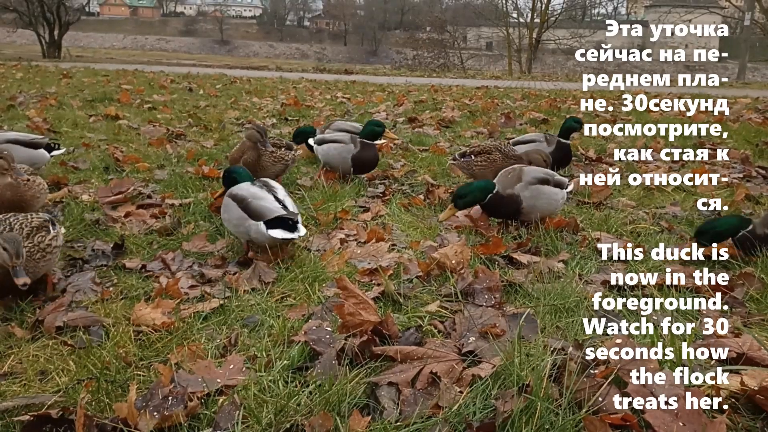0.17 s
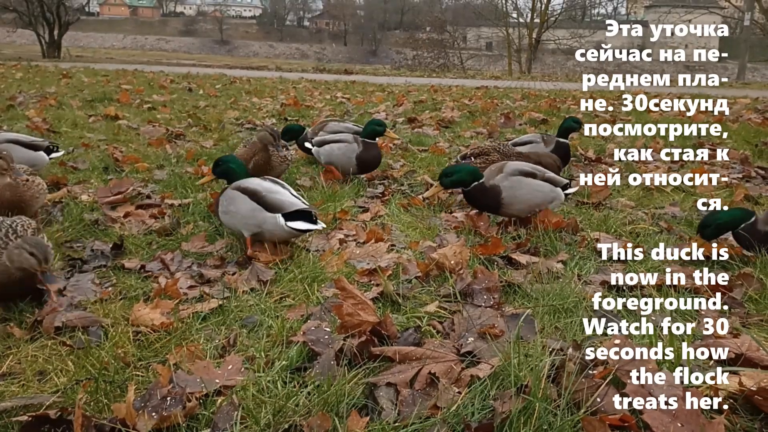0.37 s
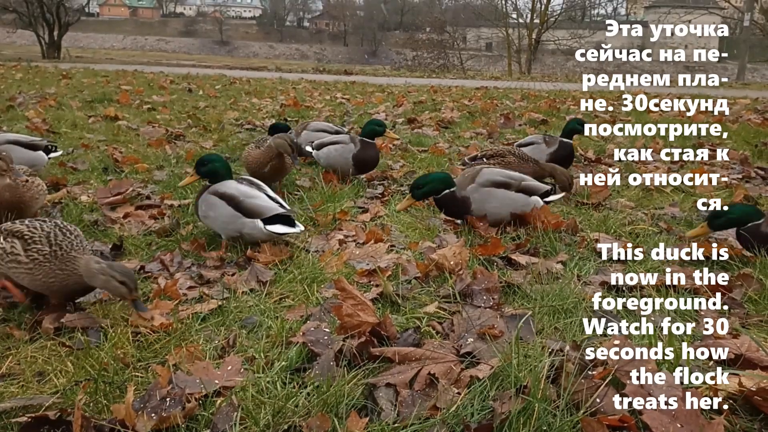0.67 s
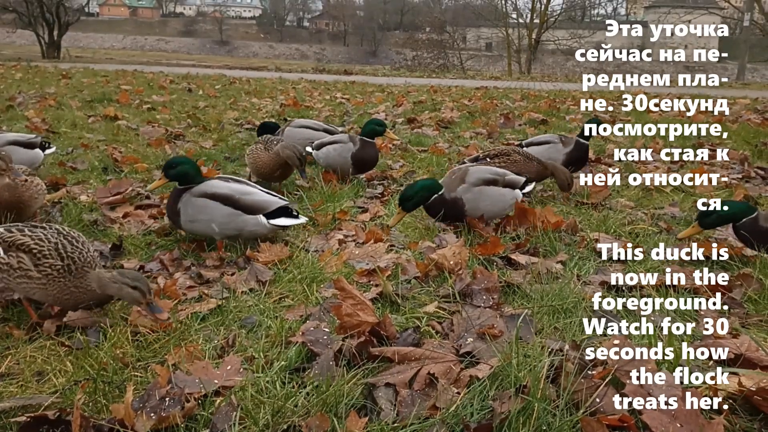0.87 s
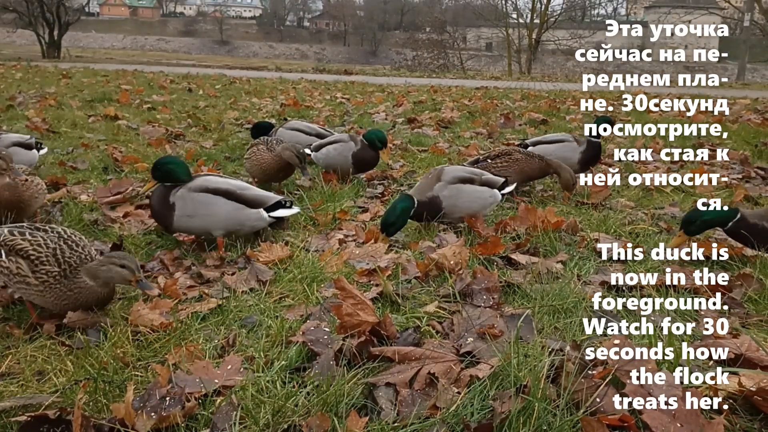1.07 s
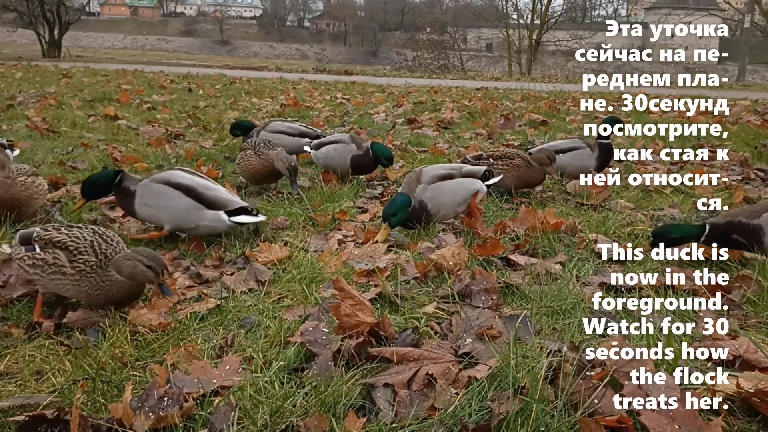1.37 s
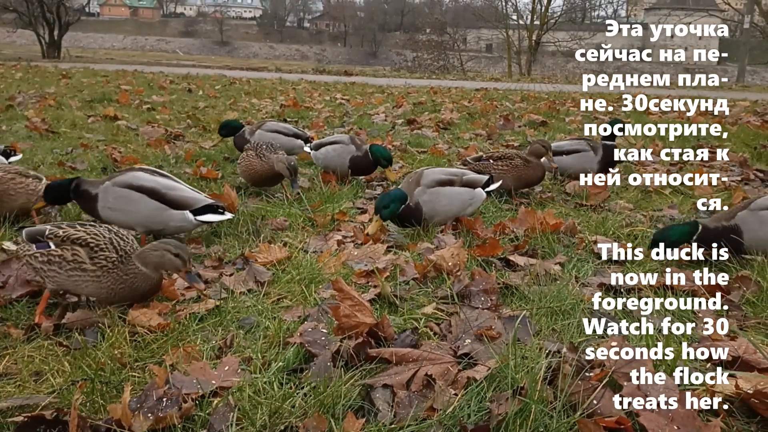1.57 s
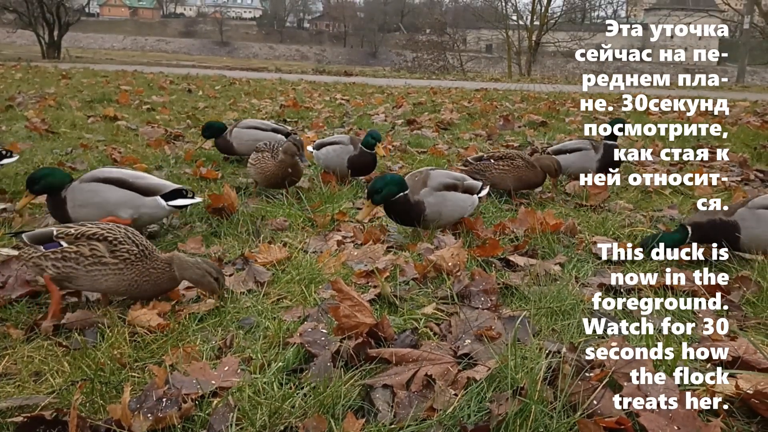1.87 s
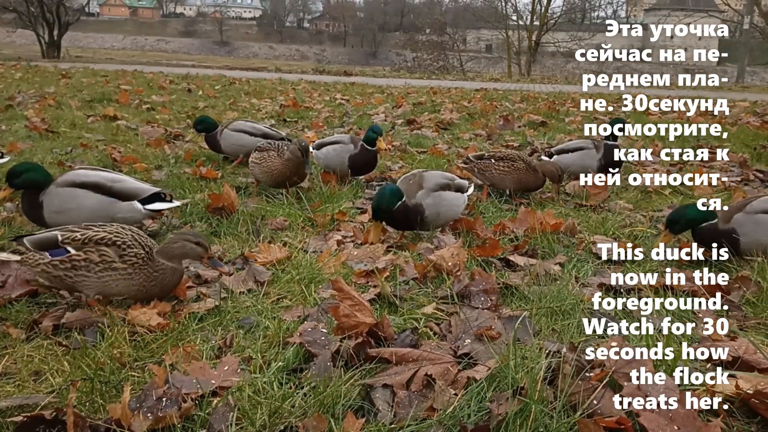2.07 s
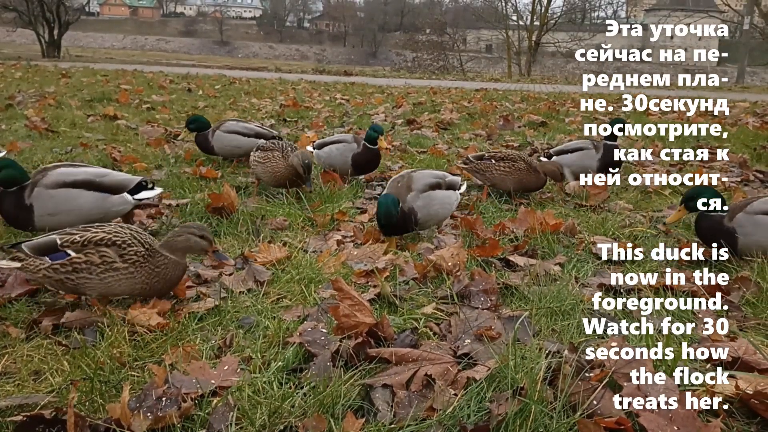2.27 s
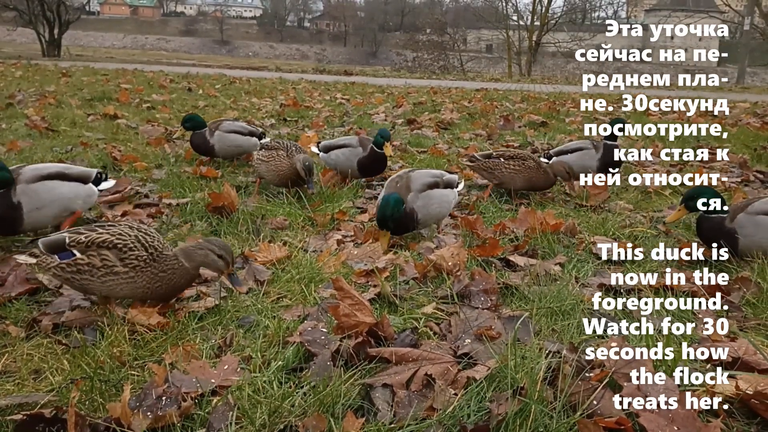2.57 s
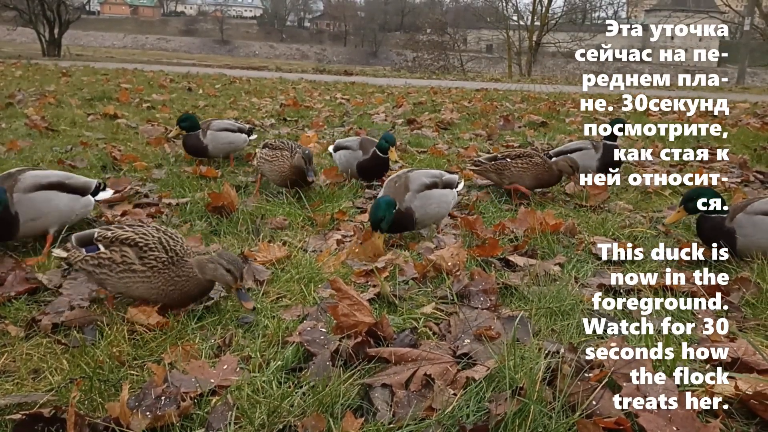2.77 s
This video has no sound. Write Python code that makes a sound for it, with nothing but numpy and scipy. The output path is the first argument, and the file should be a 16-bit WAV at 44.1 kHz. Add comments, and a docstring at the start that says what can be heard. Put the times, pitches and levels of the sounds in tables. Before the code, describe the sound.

Ducks give short, soft, raspy quacks while foraging in leaves, over low wind-like buffeting outdoors

```python
"""Ducks on a leafy lawn give short, soft, raspy quacks: breathy puffs, about a hundred a second, ring throat tones.
Their bills click, tick and pop, made from very short noise bursts; filtered noise and tiny grains stir the leaves.
Thin squeaky bird calls, made of gliding tones with a noisy haze, arch in the distance.
Low buffeting noise and filtered bumps, mostly on the left of the microphone, lie over a steady outdoor hush."""
import sys
import numpy as np
from scipy import signal
from scipy.fft import rfft, irfft
from scipy.io import wavfile

SR = 44100
rng = np.random.default_rng(int(sys.argv[2]) if len(sys.argv) > 2 else 0)


def wav_out(sig):
    """Save sig, one row per channel (or a flat mono array), as 16-bit PCM at SR to the path in sys.argv[1]."""
    wavfile.write(sys.argv[1], SR, np.round(np.clip(np.atleast_2d(sig).T, -1, 1) * 32767).astype(np.int16))


N = 129213
T = np.arange(N) / SR  # time of every sample [s]

# In all tables: balance is left minus right; a peak is the height before the balance is applied.
# Spectra give the relative strength of each pitch; the overall level is set elsewhere.

# Steady outdoor hush: (frequency [Hz], strength [dB per Hz])
HUSH_SPECTRUM = [(25, -27), (60, -6.5), (110, 1), (250, -2), (500, -11), (900, -17), (1500, -19.5),
                 (2600, -23.5), (3700, -32), (6600, -37), (8500, -46.5), (15000, -72)]
# How alike the hush is in the two ears: (frequency [Hz], left-right correlation [0 to 1])
HUSH_LIKENESS = [(100, 1), (600, 0.13), (2500, 0.15), (7000, 0.033)]
HUSH_DB = -48
# Rise and fall of the high hiss, before HISS_DB is added: (time [s], level [dB])
HISS = [(0.0, -68), (0.02, -62.5), (0.85, -62.5), (1.23, -67.5), (1.7, -59), (2.36, -68), (2.52, -59.5),
        (2.57, -68), (2.72, -59), (2.93, -65)]
# Tone of the hiss: (frequency [Hz], strength [dB per Hz])
HISS_SPECTRUM = [(3000, -27), (7000, -42), (9500, -8.5), (11400, 5), (11800, 11.5), (13500, 4),
                 (16000, -6.5)]
HISS_DB, HISS_PAN_DB = -6, 22
# Midrange rush that dies away: edges [Hz], starting level [dB], time to fall to 37 % [s]
SWELL_HZ, SWELL_DB, SWELL_FADE_S = (460, 880), -53.5, 0.21

# Rise and fall of the low buffeting, before BUFFET_DB is added: (time [s], level [dB])
BUFFET = [(0.0, -41), (0.06, -46.5), (0.37, -35), (0.4, -45.5), (0.46, -25), (0.48, -35), (0.55, -30),
          (0.74, -51.5), (0.82, -31.5), (1.02, -43.5), (1.26, -50.5), (1.32, -32), (1.39, -44), (1.44, -35),
          (1.81, -44.5), (1.84, -35), (1.93, -45), (2.1, -32), (2.14, -42), (2.3, -32.5), (2.41, -45),
          (2.49, -28.5), (2.53, -37), (2.64, -35), (2.68, -46), (2.93, -48.5)]
# Tone of the buffeting: (frequency [Hz], strength [dB per Hz])
BUFFET_SPECTRUM = [(25, -21), (42, -59), (65, -4.5), (95, 3), (160, -1), (280, -10), (450, -26.5),
                   (800, -39), (2000, -59.5)]
BUFFET_DB, BUFFET_PAN_DB, BUFFET_FLUTTER_DB = -0.5, 20, 1.5
# Low bumps on the microphone: (time [s], peak [dB], middle pitch [Hz])
BUMPS = [(0.325, -27.5, 99), (0.447, -17.5, 133), (0.498, -26, 111), (0.54, -26.5, 153),
         (0.647, -28.5, 114), (0.769, -31, 167), (0.82, -20.5, 218), (0.831, -19.5, 157),
         (0.862, -26.5, 222), (0.938, -31, 231), (1.316, -19.5, 100), (1.429, -28.5, 194),
         (1.475, -27, 107), (1.518, -27, 132), (1.569, -31, 213), (1.685, -29, 121), (1.832, -32, 104),
         (2.079, -20.5, 127), (2.269, -23, 150), (2.289, -32, 114), (2.309, -26, 161), (2.48, -20, 138),
         (2.550, -28.5, 210)]
BUMP_WIDTH, BUMP_PAN_DB = 1.695, 34  # width: edge of the band as a ratio to its middle

# Distant squeaky calls: (time [s], length [s], first pitch [Hz], middle pitch [Hz], last pitch [Hz],
# level [dB], hoarse haze against the tone [dB])
SQUEAKS = [(0.005, 0.056, 2610, 2430, 2180, -68, -11), (0.159, 0.035, 2540, 2530, 2310, -67.5, -5),
           (0.23, 0.079, 2390, 2330, 2220, -65.5, -6), (0.300, 0.031, 1730, 1903, 1680, -53, -3.5),
           (0.314, 0.035, 1470, 1450, 1350, -58, -25), (0.35, 0.0256, 2155, 1970, 1690, -55, -5),
           (0.369, 0.03, 2000, 1828, 1560, -53, -19), (0.818, 0.13, 2120, 1863, 1730, -64, -7),
           (0.896, 0.083, 2485, 2576, 2390, -64.5, -17), (1.009, 0.067, 2367, 2175, 1870, -63, -18),
           (1.112, 0.13, 2520, 2817, 2300, -64, -18), (1.344, 0.043, 2640, 2370, 2050, -54.5, -9),
           (1.400, 0.042, 2600, 2680, 2470, -59, -4.5), (1.966, 0.068, 2700, 2350, 1980, -61, -7),
           (1.969, 0.037, 2000, 1900, 1670, -55, -19), (2.279, 0.038, 2630, 2190, 2040, -57.5, -5),
           (2.293, 0.052, 2540, 2577, 2440, -62, -27.5), (2.358, 0.045, 2630, 2540, 2300, -61, -26),
           (2.521, 0.08, 2544, 2680, 2340, -65, -14), (2.746, 0.025, 2170, 2120, 1970, -49, -16),
           (2.769, 0.054, 2590, 2785, 2640, -56, -7), (2.781, 0.099, 3280, 3300, 3130, -71, -11),
           (2.805, 0.03, 2450, 2628, 2400, -43.5, -12), (2.818, 0.081, 2053, 1820, 1630, -59.5, -2)]
SQUEAK_WAVER, SQUEAK_OVERTONE_DB, HOARSE_WIDTH = .007, -34, 1.25  # waver and width are ratios of pitch

# Rise and fall of the leaf rustle, before RUSTLE_DB is added: (time [s], level [dB])
RUSTLE = [(0.0, -73), (0.22, -68.5), (0.24, -75), (0.5, -67.5), (1.18, -75), (1.64, -66.5), (1.65, -63),
          (1.79, -76), (1.84, -64), (2.05, -75.5), (2.15, -66), (2.23, -80), (2.69, -69.5), (2.93, -67)]
# Tone of the rustle: (frequency [Hz], strength [dB per Hz])
RUSTLE_SPECTRUM = [(2500, -5), (4500, 2), (6700, 9), (7600, 4), (11000, -1), (15000, -9)]
RUSTLE_DB, RUSTLE_FLICKER_DB = 3.5, 2
# Crisp ticks in the leaves: (time [s], peak [dB], balance [dB])
TICKS = [(0.510, -33.5, -27), (0.949, -45, -1), (0.964, -38.5, -15), (1.053, -44, -4), (1.376, -41, -4),
         (1.588, -37, 3), (1.625, -40, 10), (1.650, -38, 13), (1.837, -39, 9), (1.865, -35.5, 3),
         (2.522, -38, 7)]
# Tone of the ticks and the crackle: (frequency [Hz], strength [dB])
TICK_SPECTRUM = [(1000, -36), (3300, 2), (6500, -0.5), (9000, -3), (15000, 4)]
TICK_DECAY_S, CRACKLES_PER_S, CRACKLE_DB = 0.0019, 64, -65.5  # crackles are counted for each side
# Hollow bill pops: (time [s], peak [dB])
POPS = [(1.103, -42.5), (1.359, -37.5), (1.460, -45.5), (1.612, -38), (1.830, -49), (2.522, -37),
        (2.755, -37)]
POP_HZ, POP_WIDTH_HZ, POP_DECAY_S = 1190, 570, 0.0013

# Clicks of the bill opening just before a quack: (time [s], peak [dB])
BILL_CLICKS = [(0.078, -50), (0.776, -41), (1.179, -43.5), (1.669, -42), (2.126, -37.5), (2.579, -42.5)]
# Tone of the bill clicks: (frequency [Hz], strength [dB per Hz])
BILL_SPECTRUM = [(700, -15), (2200, 1), (3300, 3.5), (5000, -6), (7000, -14), (15000, -20)]
BILL_DECAY_S, BILL_PAN_DB = .0012, -3.5

# Quacks: (time [s], length [s], starting puff rate [per s], level before scaling by length [dB],
# end of the rattling tail after the start, 0 for none [s], low resonance [Hz], its level [dB],
# middle resonance [Hz], its level [dB], high resonance [Hz], its level [dB], rasp level [dB], balance [dB])
QUACKS = [(0.0954, 0.054, 110.4, -48.5, 0, 1230, -11, 1995, -2.4, 2760, -8.5, -13.5, -2.7),
          (0.3990, .060, 102.8, -51.5, 0, 2000, -5.5, 2570, -2.7, 2980, -30, -25, -1.5),
          (0.7940, 0.053, 108.1, -49.5, 0.013, 2080, -11, 2730, -9, 3350, -13, -16.5, -0.79),
          (1.194, 0.081, 103.8, -48.5, 0.17, 1420, 1, 1940, -1.4, 2420, -11, -19.5, 0.22),
          (1.6840, 0.054, 106.4, -46.5, 0.027, 1190, -14.5, 2520, -6.1, 3310, -12, -14, -1),
          (2.1420, 0.042, 103.3, -46.5, .10, 1330, -12, 2720, -6, 3450, -15.5, -12.5, -0.59),
          (2.5970, 0.048, 107.3, -47.5, 0.11, 1270, -5, 1690, -8.8, 2940, -12, -14, 0.84)]
# Upper resonances of the rasp: (frequency [Hz], width [Hz], level [dB])
RASP = [(4630, 240, 2.5), (6100, 650, -1)]
THROAT_WIDTH_HZ, BREATH_DB, BREATH_HZ, RASP_PAN_DB = 310, -5.5, (1070, 3450), -9
PULSE_WIDTH_S, PULSE_JITTER_S, PULSE_SPREAD_DB = .0017, .0002, 1.0  # puff width, uneven timing and strength
PULSE_SLACK_S = .0003  # each gap is this much longer than the last, before the uneven timing
SWELL_POWER, TAIL_DB, TAIL_FADE_DB_PER_S = 0.58, -4, 66

PARK_T60_S, PARK_DELAY_S, PARK_CUT_HZ = 0.27, 0.003, 2630  # T60: time for a 60 dB fall
QUACK_WET_DB, SQUEAK_WET_DB = -15, -11
CUTOFF_HZ = 16000


def from_db(db):
    """Turn decibels into a multiplier."""
    return 10 ** (np.asarray(db) / 20)


def rms_one(x):
    """Scale a sound so its average strength (rms) is one."""
    return x / np.sqrt(np.mean(x ** 2) + 1e-20)


def pan(db):
    """Left and right gains that differ by this many decibels, with a mean of one."""
    gains = from_db(np.array([[db], [-db]]) / 2)
    return gains / gains.mean()


def add(out, start, x):
    """Mix a sound in at a time in seconds, trimming what runs past the end."""
    i = max(int(start * SR), 0)
    out[:, i:i + x.shape[-1]] += x[..., :max(N - i, 0)]


def over_bins(points, size):
    """Read a frequency table at every step of a spectrum, joining points on a log pitch scale."""
    hz, value = np.transpose(points)
    return np.interp(np.log(np.fft.rfftfreq(size, 1 / SR) + 1), np.log(hz), value)


def level_curve(points):
    """Join a table of times and decibels into a level for every sample."""
    return np.interp(T, *np.transpose(points))


def colour(x, spectrum):
    """Shape a sound by a spectrum table, then set its rms to one."""
    size = x.shape[-1]
    return rms_one(irfft(rfft(x) * from_db(over_bins(spectrum, size)), size))


def drift(rate, size):
    """Smooth random wandering with a spread of about one; a higher rate [Hz] wanders faster."""
    r = np.exp(-2 * np.pi * rate / SR)
    noise = rng.standard_normal(size + SR // 2)  # the extra start lets the filter settle
    return rms_one(signal.lfilter([1], [1, -2 * r, r * r], noise))[-size:]


def resonance(x, hz, width_hz):
    """Ring at one pitch; a wider resonance dies away sooner."""
    r = np.exp(-np.pi * width_hz / SR)
    return signal.lfilter([1 - r, 0, r - 1], [1, -2 * r * np.cos(2 * np.pi * hz / SR), r * r], x)


def band(x, low_hz, high_hz, order=2):
    """Keep mainly the sound between two pitches."""
    return signal.sosfilt(signal.butter(order, [low_hz, high_hz], "band", fs=SR, output="sos"), x)


def background():
    """Shaped noise makes the steady hush of the park, a fading midrange rush and a thin high hiss."""
    shared, opposite = rfft(rng.standard_normal((2, N)))
    alike = over_bins(HUSH_LIKENESS, N)
    # The second part has opposite signs left and right, which makes the two sides differ.
    sides = np.sqrt(1 + alike) * shared + np.sqrt(1 - alike) * opposite * [[1], [-1]]
    hush = from_db(HUSH_DB) * colour(irfft(sides, N), HUSH_SPECTRUM)
    hiss = colour(rng.standard_normal((2, N)), HISS_SPECTRUM) * from_db(level_curve(HISS) + HISS_DB)
    rush = rms_one(band(rng.standard_normal((2, N)), *SWELL_HZ))
    fading_rush = from_db(SWELL_DB) * np.exp(-T / SWELL_FADE_S) * rush
    return fading_rush + hush + pan(HISS_PAN_DB) * hiss


def buffeting():
    """Low noise of fluttering strength, with dull bumps made by ringing a low band filter once."""
    flutter = from_db(BUFFET_FLUTTER_DB * drift(rate=41, size=N))
    lumps = colour(rng.standard_normal((2, N)) * flutter, BUFFET_SPECTRUM)
    out = from_db(level_curve(BUFFET) + BUFFET_DB) * pan(BUFFET_PAN_DB) * lumps
    for start, db, hz in BUMPS:
        bump = band(signal.unit_impulse(SR // 10), hz / BUMP_WIDTH, hz * BUMP_WIDTH, order=3)
        add(out, start, from_db(db) * pan(BUMP_PAN_DB) * bump / np.abs(bump).max())
    return out


def squeaks():
    """Wavering tones glide along a curve through three pitches, each with a hoarse haze of noise."""
    out = np.zeros((2, N))
    for start, length, first, middle, last, db, hoarse_db in SQUEAKS:
        progress = np.minimum(T[:SR // 6] / length, 1)
        size = len(progress)
        glide = np.polyval(np.polyfit([0, .5, 1], [first, middle, last], 2), progress)
        hz = glide * (1 + SQUEAK_WAVER * drift(rate=190, size=size))
        phase = 2 * np.pi * np.cumsum(hz) / SR
        # The haze reaches further below the middle pitch than above it.
        low_hz, high_hz = middle / HOARSE_WIDTH ** 2, middle * HOARSE_WIDTH
        haze = rms_one(band(rng.standard_normal(size), low_hz, high_hz, order=4))
        tone = np.sin(phase) + from_db(SQUEAK_OVERTONE_DB) * np.sin(2 * phase)
        call = tone + from_db(hoarse_db) * haze
        rise_and_fall = np.abs(np.sin(np.pi * progress)) ** 0.43
        add(out, start, from_db(db) * rise_and_fall * call)
    return out


def rustle():
    """Feet and bills keep the leaves faintly stirring: bright noise whose strength flickers."""
    flicker = from_db(RUSTLE_FLICKER_DB * drift(rate=70, size=N))
    grain = rng.standard_normal((2, N)) * flicker
    return colour(grain, RUSTLE_SPECTRUM) * from_db(level_curve(RUSTLE) + RUSTLE_DB)


def ticks():
    """Dry ticks in the leaves: bright noise that dies away within milliseconds."""
    out, t = np.zeros((2, N)), T[:SR // 20]
    for start, db, pan_db in TICKS:
        tick = colour(rng.standard_normal((2, len(t))), TICK_SPECTRUM) * np.exp(-t / TICK_DECAY_S)
        add(out, start, from_db(db) * pan(pan_db) * tick / np.abs(tick).max())
    return out


def pops():
    """Hollow bill pops: a tiny burst of noise rings one resonance."""
    out, t = np.zeros((2, N)), T[:SR // 20]
    for start, db in POPS:
        burst = rng.standard_normal(len(t)) * np.exp(-t / POP_DECAY_S)
        pop = band(resonance(burst, POP_HZ, POP_WIDTH_HZ), low_hz=574, high_hz=1670, order=4)
        add(out, start, from_db(db) * pop / np.abs(pop).max())
    return out


def crackle():
    """Trodden leaves crackle faintly: snaps at random moments start short fading grains of noise."""
    strength = from_db(3.6 * np.minimum(rng.exponential(1, (2, N)), 3))
    snaps = (rng.random((2, N)) < CRACKLES_PER_S / SR) * strength
    fade = np.exp(-1 / (TICK_DECAY_S * SR))
    envelope = signal.lfilter([1], [1, -fade], snaps + 1e-18)
    return from_db(CRACKLE_DB) * colour(envelope * rng.standard_normal((2, N)), TICK_SPECTRUM)


def bill_clicks():
    """A short, bright burst of noise as the bill opens."""
    out, t = np.zeros((2, N)), T[:SR // 20]
    for start, db in BILL_CLICKS:
        click = colour(rng.standard_normal(len(t)), BILL_SPECTRUM) * np.exp(-t / BILL_DECAY_S)
        add(out, start, from_db(db) * pan(BILL_PAN_DB) * click / np.abs(click).max())
    return out


def puff_gate(t, length, rate, tail_end):
    """Opening of the throat over time: a run of puffs that swells, slows and may trail off in a rattle."""
    k = np.arange(15)
    at = k / rate + PULSE_SLACK_S * k * (k - 1) / 2
    swell = np.abs(np.sin(np.pi * np.minimum((at + .5 / rate) / length, 1))) ** SWELL_POWER
    tail = from_db(TAIL_DB - TAIL_FADE_DB_PER_S * at) * (at < tail_end)
    strength = np.maximum(swell, tail) * from_db(PULSE_SPREAD_DB * rng.standard_normal(len(k)))
    # One gap of room in front lets the first puff rise.
    at = at + 1 / rate + PULSE_JITTER_S * rng.standard_normal(len(k))
    return strength @ np.exp(-.5 * ((t - at[:, None]) / PULSE_WIDTH_S) ** 2)


def quacks():
    """Noisy puffs of air ring three throat resonances, with breath around them and a rasp above."""
    out, t = np.zeros((2, N)), T[:SR // 5]
    for start, length, rate, db, tail_end, hz1, db1, hz2, db2, hz3, db3, rasp_db, pan_db in QUACKS:
        # Seven separate noises: three for the throat, two for the breath, two for the rasp.
        puffs = puff_gate(t, length, rate, tail_end) * rng.choice([-1, 1], (7, len(t)))
        throat = 0
        for puff, hz, level_db in zip(puffs, (hz1, hz2, hz3), (db1, db2, db3)):
            ring = resonance(resonance(puff, hz, THROAT_WIDTH_HZ), hz, THROAT_WIDTH_HZ)
            throat = throat + from_db(level_db) * rms_one(ring)
        breath = rms_one(band(puffs[3:5], *BREATH_HZ, order=4))
        throat = rms_one(throat + from_db(BREATH_DB) * breath)
        rasp = sum(from_db(g) * resonance(puff, hz, width) for puff, (hz, width, g) in zip(puffs[5:], RASP))
        rasp = rms_one(band(rasp, low_hz=3000, high_hz=7500))
        voice = throat * pan(pan_db) + from_db(rasp_db) * rasp * pan(RASP_PAN_DB)
        # rms was taken over all of t, so a shorter quack is scaled down.
        add(out, start - 1 / rate, voice * np.sqrt(length / t[-1]) * from_db(db))
    return out


def park(x):
    """Dull, short scatter from the ground and trees: the sound is smeared by a fading burst of noise."""
    t = T[:SR // 2]
    noise = band(rng.standard_normal((2, len(t))), 290, PARK_CUT_HZ)
    tail = noise * from_db(-60 * t / PARK_T60_S) * (t > PARK_DELAY_S)
    return signal.fftconvolve(x, rms_one(tail) / np.sqrt(len(t)), axes=1)[:, :N]


def scene():
    """Ducks near by, birds far off, and the air around the microphone."""
    air = background() + buffeting()
    far = squeaks()
    leaves = rustle() + ticks() + pops() + crackle()
    near = bill_clicks() + quacks()
    scatter = park(from_db(QUACK_WET_DB) * near + from_db(SQUEAK_WET_DB) * far)
    return air + far + leaves + near + scatter


def record(dry):
    """Cut the highest treble steeply."""
    return signal.sosfilt(signal.ellip(12, .1, 80, CUTOFF_HZ, fs=SR, output="sos"), dry)


dry = scene()
out = record(dry)
wav_out(out)
```